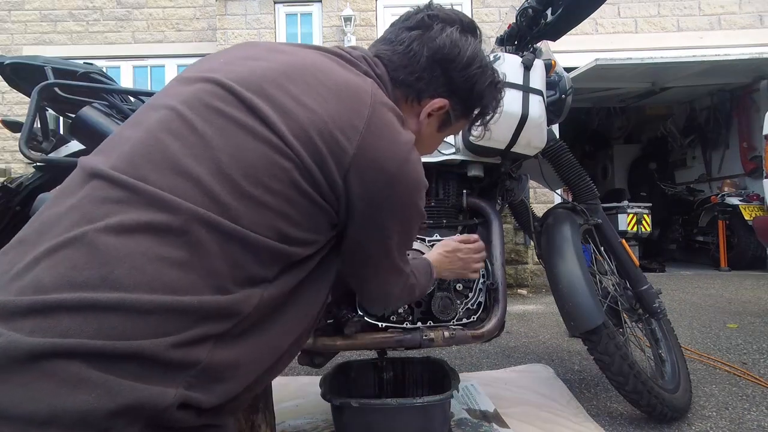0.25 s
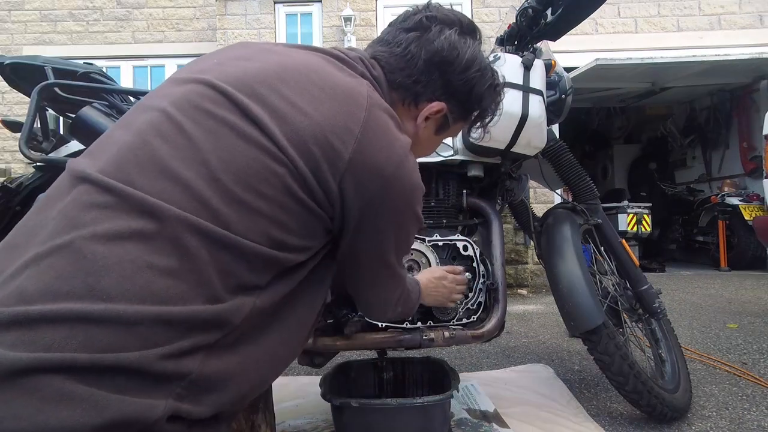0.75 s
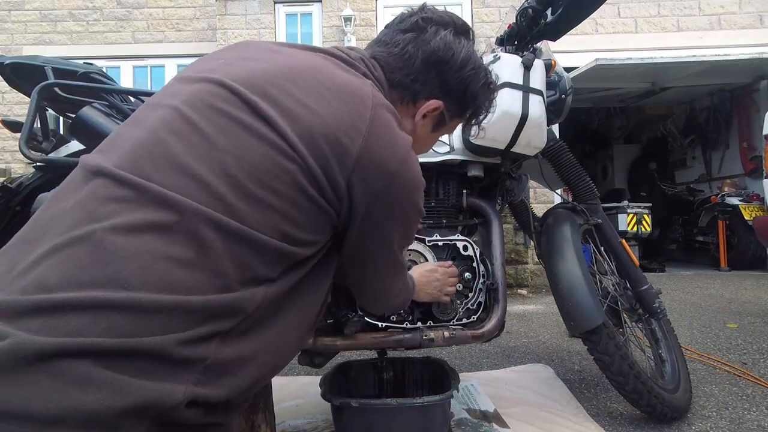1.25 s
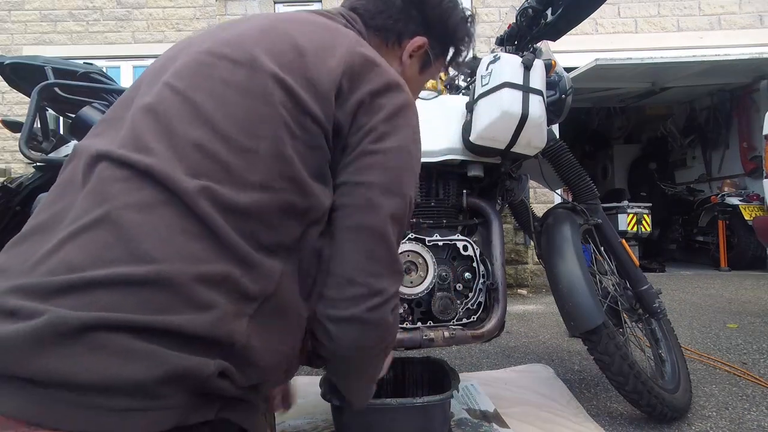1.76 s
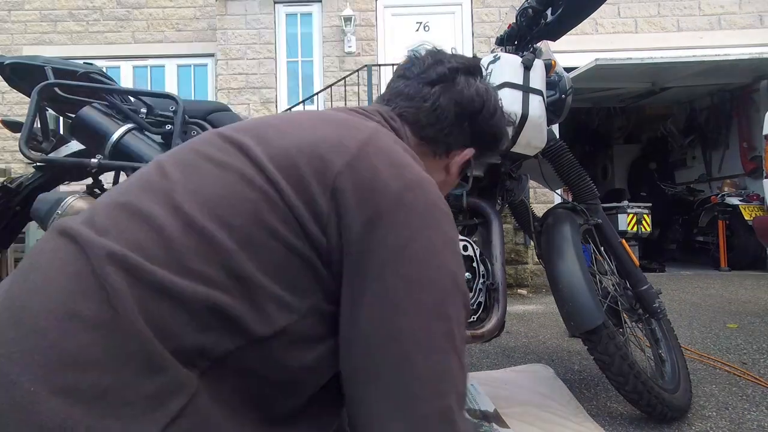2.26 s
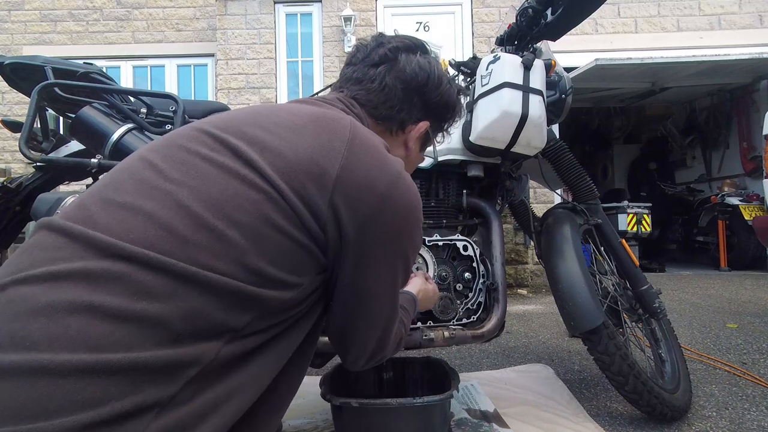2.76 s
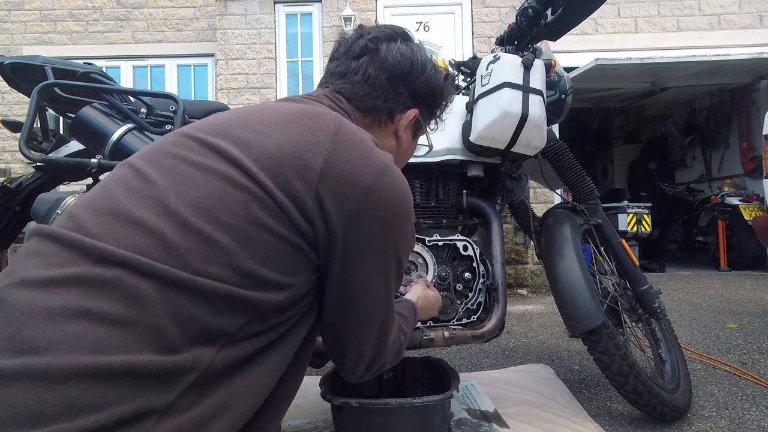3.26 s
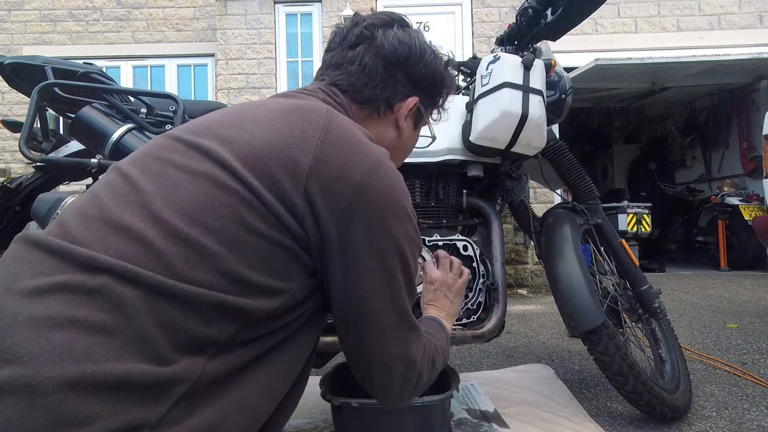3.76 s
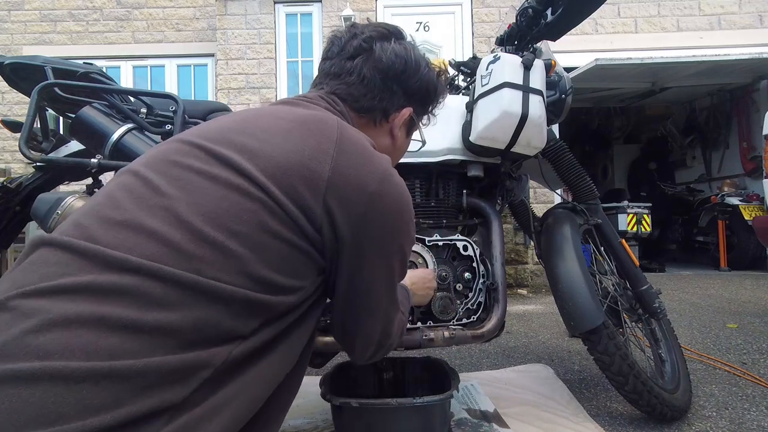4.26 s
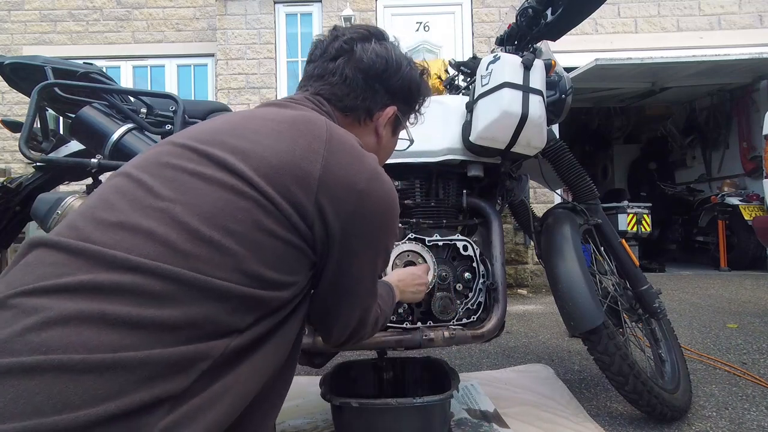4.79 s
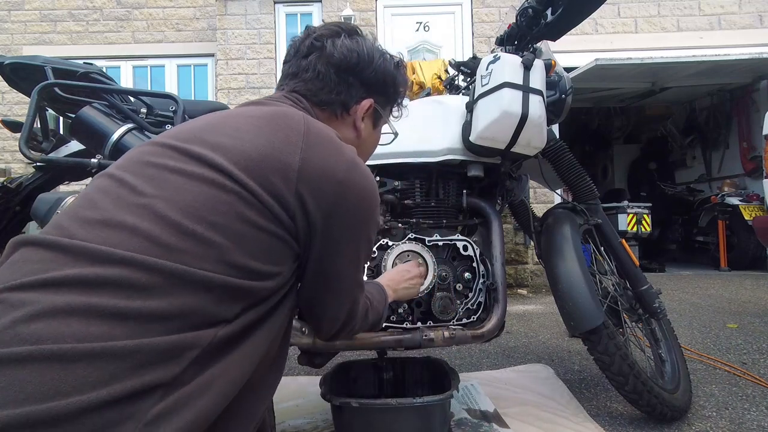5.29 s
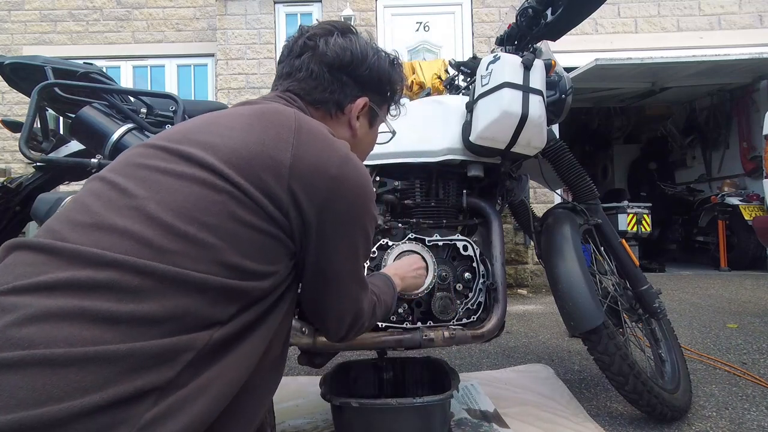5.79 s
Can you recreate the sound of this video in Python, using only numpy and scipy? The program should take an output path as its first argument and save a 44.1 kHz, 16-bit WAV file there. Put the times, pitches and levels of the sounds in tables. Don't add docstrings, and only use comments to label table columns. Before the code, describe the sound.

A driveway beside an open garage, heard through a small hissy camera microphone with low, distant traffic throughout. At 0.1 s an oily steel plate lands in a clutch basket with a quick double clack and a soft low boom, with a late tick at 0.2. A second, duller plate lands at 0.38, slides and is pushed home at 0.45. From 0.8 to 0.94 a third rattles, scrapes and snaps in loudly near 0.9. After faint touches at 1.26, the hardest, brightest knock comes at 1.3, with a boomy push at 1.35; the housing tolls on briefly and the garage echoes. From 1.8 to 2.8 only faint cloth rubs and a tiny low bump at 2.3. Quiet until 4.24, when light, damped small-part clicks begin, with a cloth brush at 4.4, more ticks to 4.8, and sharper clicks at 5.12 and 5.26. Far bird whistles flutter downward from 5.3 to 6.

```python
import sys
import numpy as np
from scipy import signal
from scipy.fft import rfft, irfft, next_fast_len
from scipy.io import wavfile
from scipy.ndimage import uniform_filter1d

SR = 44100
rng = np.random.default_rng(int(sys.argv[2]) if len(sys.argv) > 2 else 0)


def wav_record(signal):
    frames = np.transpose(np.atleast_2d(signal))
    bounded = np.clip(frames, -1, 1)
    quanta = np.round(bounded * 32767).astype(np.int16)
    wavfile.write(sys.argv[1], SR, quanta)


def elevation(decibels):
    levels = np.asarray(decibels, float)
    return 10 ** (levels / 20)


N = 266099

# (mode [Hz], width [Hz], level [dB])
BASKET_MODES = [(660, 119, -9), (880, 61, -1), (1100, 79, -5.5), (1214, 44, -1.5), (1400, 49, -3),
                (1460, 47, -2), (1547, 61, -1.5), (1660, 48, 0), (1760, 67, -4.5), (2100, 24, -2),
                (2174, 120, -6), (2410, 40, -3.5), (2520, 39, -9), (2897, 64, -3.5), (3250, 140, -10),
                (3410, 59, -3.5), (3650, 82, -17.5), (4640, 133, -6), (5010, 300, -7.5), (5230, 144, -7),
                (5420, 100, -21), (6200, 32, -12), (6650, 120, -23), (7370, 170, -13), (7770, 110, -11),
                (8130, 140, -28.5), (9000, 130, -16.5), (9000, 190, -19), (10700, 150, -30)]


def unit(x):
    return x / np.sqrt(np.mean(x ** 2) + 1e-20)


def along(points, hz):
    f, v = np.transpose(points)
    return np.interp(np.log(hz + 1), np.log(f + 1), v)


def filtered(x, response):
    m = next_fast_len(len(x) + SR // 8)
    return irfft(rfft(x, m) * response(np.fft.rfftfreq(m, 1 / SR)), m)[:len(x)]


def resonances(modes):
    def response(f):
        total = 0
        for k, (hz, width, db) in enumerate(modes):
            damping = 1j * f * width
            total = total + (-1) ** k * elevation(db) * damping / (hz * hz - f * f + damping)
        return total
    return response


def minimum_phase(points):
    def response(f):
        cepstrum = irfft(np.log(elevation(along(points, f))))
        cepstrum[1:len(f) - 1] *= 2
        cepstrum[len(f):] = 0
        return np.exp(rfft(cepstrum))
    return response


def rush(spectrum, patchy_db):
    z = signal.stft(rng.standard_normal(N), nperseg=512)[2]
    field = uniform_filter1d(rng.standard_normal(z.shape), size=6, axis=0)
    field = uniform_filter1d(field, size=10, axis=1)
    patchy = signal.istft(z * elevation(patchy_db * unit(field)), nperseg=512)[1][:N]
    return unit(filtered(patchy, lambda hz: elevation(along(spectrum, hz))))


def add(track, s, sound, db):
    track[round(s * SR):][:len(sound)] += elevation(db) * sound / np.max(np.abs(sound))


def strokes(rows):
    t = np.arange(0, N / SR, 1 / 1000)
    level = np.zeros(len(t))
    for s, db, rise, fall in rows:
        away = np.where(t < s, (s - t) / rise, (t - s) / fall)
        level += elevation(db - 20 * away ** 1.27)
    return np.interp(np.arange(N) / SR, t, level)


def background():
    # (time [s], level [dB])
    street = [(0.0, -58), (0.87, -58), (0.96, -58), (1.29, -57), (1.43, -56.5), (1.64, -58), (2.47, -58),
              (3.19, -61), (4.28, -60), (4.43, -59), (6.03, -58)]
    # (frequency [Hz], level [dB per Hz])
    deep = [(20, -42.5), (35, 2.5), (43, 3), (55, 3.5), (68, -7), (90, -5.5), (120, -63.5)]
    # (frequency [Hz], level [dB per Hz])
    low_rumble = [(50, -67), (85, -47), (102, -56.5), (135, -4), (164, 2.5), (188, -3), (221, -3),
                  (258, -5.5), (329, -9.5), (383, -12.5), (450, -15), (580, -37), (990, -120)]
    # (frequency [Hz], level [dB per Hz])
    far_traffic = [(240, -35.5), (400, -3), (530, -2), (730, -4), (1100, -5.5), (1600, -8), (2200, -11.5),
                   (2800, -14.5), (3400, -19), (3900, -23.5), (4300, -27.5), (4800, -25), (5250, -20),
                   (5800, -27.5)]
    # (frequency [Hz], level [dB per Hz])
    mic_hiss = [(4000, -62), (5200, -19), (5850, -10.5), (6270, -1), (7080, 0), (8240, -1), (9900, -3.5),
                (11400, -8.5), (12400, -8.5), (14700, -11.5), (15700, -18.5)]
    s, db = np.transpose(street)
    swell_db = np.interp(np.arange(N) / SR, s, db)
    swell_db = swell_db - np.mean(swell_db)
    rumble = elevation(-56 + 1.34 * swell_db) * rush(low_rumble, patchy_db=1)
    rumble = rumble + elevation(-78.5) * rush(deep, patchy_db=-2.5)
    traffic = elevation(-60.5 + 0.96 * swell_db) * rush(far_traffic + [(8000, -92)], patchy_db=0.73)
    hiss = elevation(-66 + 0.82 * swell_db) * rush(mic_hiss, patchy_db=0.2)
    return rumble + traffic + hiss


def bird():
    # (time [s], length [s], start [Hz], end [Hz], level [dB])
    chirps = [(5.31, .04, 2700, 2580, -67), (5.382, .035, 2700, 2600, -64), (5.41, .035, 2520, 2430, -67),
              (5.447, 0.035, 2680, 2600, -73), (5.599, 0.032, 2770, 2250, -57),
              (5.64, 0.046, 2640, 2610, -69), (5.788, 0.035, 2450, 2250, -62),
              (5.808, 0.035, 1964, 1580, -59), (5.893, 0.0314, 2520, 2210, -57.5),
              (5.912, 0.021, 2160, 1900, -59), (5.926, 0.039, 2460, 1980, -62),
              (6.015, 0.018, 2340, 2210, -58)]
    track = np.zeros(N + SR)
    for s, length, start_hz, end_hz, db in chirps:
        u = np.linspace(0, 1, round(length * SR))
        phase = 2 * np.pi * np.cumsum(start_hz + (end_hz - start_hz) * u ** 1.11) / SR
        flutter = 1 + 0.25 * np.interp(u, np.linspace(0, 1, 7), rng.standard_normal(7))
        whistle = np.sin(phase) + 0.42 * np.sin(phase / 2)
        add(track, s, flutter * np.sin(np.pi * u) * whistle, db + 4.0)
    return track[:N]


def thump():
    track, t = np.zeros(N + SR), np.arange(SR // 10) / SR
    add(track, 2.29, t * np.exp(-t / 0.0018), -55)
    return track[:N]


def shuffle():
    # (peak time [s], level [dB], rise [s], fall [s])
    rubs = [
        (1.81, -80, .12, .12),
        (1.964, -67, 0.055, 0.13),
        (2.2, -68, .25, .08),
        (2.276, -66.5, .06, 0.032),
        (2.466, -68, 0.14, .035),
        (2.65, -71, 0.34, .27),
        (4.362, -72, .035, .05),
        (4.402, -58.5, 0.019, 0.073),
        (4.686, -65, .014, .03),
        (4.74, -66, .012, .13),
    ]
    # (frequency [Hz], level [dB])
    fabric = [(700, -39), (1200, -4), (2500, -8), (4200, -17), (5200, -4), (5900, -16), (8000, -14),
              (11000, -23), (14000, -61)]
    grains = rng.standard_normal(N) * elevation(3.0 * rng.exponential(size=N))
    cloth = unit(filtered(grains, lambda hz: elevation(along(fabric, hz))))
    return elevation(4.0) * strokes(rubs) * cloth


def contact(track, s, db, hz, bright_db, top_db, chatter_ms, damping, crack_db, lowest):
    t = np.arange(SR // 12) / SR
    u = 1000 * t / max(chatter_ms, .15)
    chatter = u * np.exp(-u) * rng.standard_normal(len(t)) * elevation(2.47 * rng.exponential(size=len(t)))
    struck = []
    for mode_hz, width, level in BASKET_MODES:
        near_db = 8 * np.exp(-(np.log2(mode_hz / hz) / 0.1) ** 2)
        struck.append((mode_hz, damping * width, level + rng.normal(0, 3.0) + near_db))
    ring = unit(filtered(chatter, resonances(struck))) + elevation(crack_db) * unit(chatter)

    def clack(f):
        return 1 / (1 + (f / 3900) ** 8) / (1 + (lowest * hz / (f + 1)) ** 4)

    def bright(f):
        return elevation(-3 * (np.log2(f / 5100 + 1e-9) / 0.26) ** 2)

    def top(f):
        return 1 / (1 + (f / 12500) ** 4) / (1 + (6500 / (f + 1)) ** 12)

    add(track, s, filtered(ring, clack), db)
    add(track, s, filtered(ring, bright), db + bright_db - 3.0)
    add(track, s, filtered(ring, top), db + top_db)


def small_parts():
    # (time [s], clack [dB], strongest ring [Hz], top [dB re clack], chatter [ms])
    clicks = [(4.240, -40.5, 1790, 1, 1.5), (4.244, -46.5, 3700, -5, 3.2), (4.261, -51, 1740, -3, 1.6),
              (4.353, -53, 1760, -20, 7.4), (4.3955, -39, 1900, -18, 1), (4.403, -41.5, 2240, 15.5, 1.4),
              (4.410, -44, 1190, 10.5, 2.4), (4.427, -53, 1500, -14, 4), (4.520, -47.5, 2000, -10, 2.4),
              (4.682, -46.5, 1800, 0, 1.1), (4.737, -51.5, 2100, -4, 2.1), (4.783, -56, 1760, -10, 2.1),
              (5.009, -50.5, 2420, -18, 2.2), (5.078, -54, 1510, -25, 3), (5.1157, -42, 1760, 4, 0.64),
              (5.122, -53, 2570, 5, 2.3), (5.2585, -39, 2030, 11, 0.7), (5.265, -46, 2020, 8, 0.84)]
    track = np.zeros(N + SR)
    for s, db, hz, top_db, chatter_ms in clicks:
        bright_db = -3.5 + 0.27 * top_db
        contact(track, s, db, hz, bright_db, top_db, chatter_ms, damping=1.45, crack_db=0.5, lowest=0.41)
    return track[:N]


def tolls():
    # (time [s], mode [Hz], level [dB], t60 [s])
    long_modes = [(.1, 582, -48, .35), (.9, 925, -47, .7), (.9, 582, -46, .4), (1.304, 888, -46, .8),
                  (1.352, 931, -44, .9), (1.352, 581, -39, .5), (1.352, 393, -42, .43),
                  (1.352, 458, -48, .55), (1.352, 818, -50, .6), (1.352, 732, -52, .7),
                  (.94, 4650, -50, .13)]
    track, t = np.zeros(N + SR), np.arange(SR // 2) / SR
    for s, hz, db, t60 in long_modes:
        pair = np.sin(2 * np.pi * hz * t) + .45 * np.sin(2 * np.pi * 1.013 * hz * t)
        add(track, s, (1 - np.exp(-t / .003)) * elevation(-60 * t / t60) * pair, db)
    return track[:N]


def housing(knocks):
    # (mode [Hz], width [Hz], level [dB])
    long_ring = [(390.5, 8, 8.5), (458, 6, 5), (582, 5.1, 12), (732, 6, -1), (818, 6, 2.5), (888, 4, 2),
                 (931, 7, 2), (1480, 14, -15), (1100, 8, -12), (4660, 45, -18), (5340, 90, -20),
                 (7650, 50, -10)]
    return elevation(-10.5) * filtered(knocks, resonances(long_ring))


def frame():
    # (time [s], level [dB], hardness [dB])
    pushes = [(.093, -32, -1), (.099, -42, -15), (.124, -37, -4.5), (0.386, -47.5, 5), (0.401, -42, -2.5),
              (.452, -35.5, -13), (0.807, -29.5, -2), (.836, -30.5, 3), (0.864, -36.5, 0),
              (0.878, -30, 6.5), (0.901, -26, -9), (.925, -33, -3.5), (.968, -39, -22), (1.252, -40, -6),
              (1.302, -30.5, 3), (1.352, -19, -8.5), (1.378, -24, -10)]
    # (mode [Hz], width [Hz], level [dB])
    boom_modes = [(163.3, 24.2, -6), (204.8, 21.7, -2.5)]
    # (mode [Hz], width [Hz], level [dB])
    panel_modes = [(240, 76, -2), (331.5, 44, 0.5), (427, 48, -2.5), (555, 67, -5), (619, 34, -1.5)]
    track, t = np.zeros(N + SR), np.arange(SR // 3) / SR
    boom = filtered(t * np.exp(-t / 0.0085), resonances(boom_modes))
    for s, db, hard_db in pushes:
        add(track, s, boom, db)
        shake = t * np.exp(-t / 0.0095) * rng.standard_normal(len(t))
        rattle = filtered(shake, resonances(panel_modes))
        add(track, s, filtered(rattle, resonances([(415, 570, 0)])), db + hard_db)
    return track[:N]


def scrape():
    # (peak time [s], level [dB], rise [s], fall [s])
    slides = [
        (.39, -48, 0.013, .13),
        (.812, -44, 0.0067, 0.11),
        (.86, -44, .05, .06),
        (.90, -38, .06, 0.077),
    ]
    grains = rng.standard_normal(N) * elevation(3 * rng.exponential(size=N))
    held = [(hz, 2.4 * width, db - 2.9 * np.log2(hz / 1500)) for hz, width, db in BASKET_MODES]
    return strokes(slides) * unit(filtered(grains, resonances(held)))


def rings():
    # (time [s], mode [Hz], level [dB])
    ringing_modes = [(.0965, 1670, -19), (0.1005, 1717, -20), (.096, 863, -29), (.096, 1155, -26),
                     (0.1003, 1484, -23), (.216, 1627, -40.5), (.385, 1646, -25), (.449, 1146, -30.5),
                     (.806, 680, -29.5), (.806, 1424, -29), (.879, 1155, -21.5), (.898, 1680, -16.5),
                     (1.257, 554, -45), (1.258, 1190, -49), (1.258, 800, -47), (.812, 1480, -32),
                     (4.737, 1850, -55), (4.25, 1750, -52), (1.286, 740, -44), (1.3062, 1230, -31),
                     (1.311, 1424, -21), (1.3055, 695, -22), (1.3055, 1465, -18), (1.35, 640, -28.5),
                     (1.35, 1520, -27), (4.241, 1733, -47), (4.241, 1075, -50.5), (4.354, 1770, -53),
                     (4.397, 1720, -47), (4.684, 1800, -54), (5.116, 1820, -40), (5.258, 1947, -33),
                     (5.258, 1760, -39),
                     (0.102, 3410, -31), (0.11, 2280, -33), (.099, 4730, -29), (.385, 2044, -24),
              (.386, 3310, -33), (.386, 5100, -35), (.4495, 7830, -47), (.386, 6040, -41.5),
              (.853, 6150, -39), (.853, 4600, -37), (.823, 5400, -36), (.881, 7680, -33),
              (.8985, 4826, -25), (.8985, 5370, -31), (.939, 4300, -34.5), (.938, 3330, -36),
              (.853, 3310, -34), (.852, 2140, -37), (1.304, 3840, -26.5), (1.304, 5180, -26),
              (1.304, 3322, -30), (1.351, 5210, -29.5), (4.356, 5150, -57), (4.366, 5400, -61),
              (4.524, 5000, -59), (4.688, 5250, -55.5), (4.738, 5200, -58), (4.783, 5150, -61),
              (4.415, 4950, -53), (4.241, 4900, -50), (.395, 2100, -33), (.449, 3350, -44),
              (.452, 4800, -40.5), (.851, 7600, -44.5), (.888, 7650, -39.5), (.946, 4650, -37),
              (.904, 6600, -36), (1.351, 2080, -30), (5.116, 2570, -45), (5.258, 5290, -38),
              (5.259, 9210, -35), (5.259, 8750, -35), (4.404, 4630, -47), (2.452, 5400, -57),
              (1.955, 5200, -61)]
    track, t = np.zeros(N + SR), np.arange(SR // 8) / SR
    for s, hz, db in ringing_modes:
        t60 = 0.047 * 0.77 ** np.log2(hz / 2000) - .0005 * (db + 33)
        wander = np.cumsum(rng.standard_normal(len(t))) * 0.038 * np.sqrt(hz / 2000)
        beat = 1 + .5 * np.cos(2 * np.pi * hz * rng.uniform(0.013, 0.048) * t)
        choke = elevation(-60 * (t / (.75 * t60)) ** 1.6)
        tone = np.sin(2 * np.pi * hz * t + wander)
        add(track, s, (1 - np.exp(-t / 0.0005)) * choke * beat * tone, db)
    return track[:N]


def blow():
    track, t = np.zeros(N + SR), np.arange(SR // 100) / SR
    pulse = np.sin(2 * np.pi * 1120 * t) * t ** 2 * np.exp(-t / .0005)
    add(track, 1.3028, pulse, -6)
    return track[:N]


def plates():
    # (time [s], clack [dB], strongest ring [Hz], bright [dB re clack], chatter [ms])
    first = [
        (.088, -42, 1650, -14, 2.7),
        (.0948, -16.5, 1680, -9, 2.5),
        (.1007, -16.5, 1510, -3, 0.76),
        (.108, -27, 2380, -7, 2.4),
        (.213, -39, 1660, -23, 2.3),
    ]
    second = [
        (0.3838, -19, 1960, -11, 1.9),
        (.395, -26, 2100, -24, 1.4),
        (.403, -37, 1660, -19, 1.6),
        (.423, -36, 1690, -32, 5.3),
        (.444, -38, 1510, -12, 2),
        (0.4487, -22.5, 1230, -12, 0.76),
        (.455, -30.5, 2290, -9, 0.78),
    ]
    third = [(.8055, -24.5, 666, -17, 1.2), (.809, -33, 1400, -11, 2.5), (.822, -27, 3250, -7, 1.7),
             (.828, -23.5, 1770, -21, 2.1), (.837, -28.5, 1580, -8, 2.7), (.850, -27, 2100, -5, 3.3),
             (.858, -29, 3250, -13, 3.4), (.880, -21, 1120, -11, 1.5), (.8845, -19, 1500, -14, 2),
             (.8972, -12, 1700, -4, 1.5), (.905, -22, 1780, -3, 1.2), (.909, -27, 2200, -4, 1),
             (.913, -36, 1660, -14, 3.7), (.938, -28.5, 2240, -7, 3.4)]
    fourth = [
        (1.2575, -45, 800, -25, 1.5),
        (1.286, -38.5, 760, -23, 1.9),
        (1.294, -25.5, 1080, -18, 6.6),
        (1.3035, -17, 3310, -4, 1.46),
        (1.306, -17, 1470, -20.5, 3.7),
        (1.3507, -19, 900, -13, 1.4),
        (1.357, -28.5, 1460, -16, 3.5),
    ]
    dry_dbs = [
        -13.5,
        -21,
        -9.5,
        -1,
    ]
    track = np.zeros(N + SR)
    for contacts, dry_db in zip([first, second, third, fourth], dry_dbs):
        for s, db, hz, bright_db, chatter_ms in contacts:
            top_db = dry_db + 0.9 * bright_db
            contact(track, s, db, hz, bright_db, top_db, chatter_ms, damping=1.88, crack_db=-2.5, lowest=0.36)
    return track[:N]


def echo(x, t60s, delay_s):
    out, size = np.zeros(N + SR), SR // 4
    for start in range(0, N, size):
        hz, t, z = signal.stft(rng.standard_normal(SR // 2), SR, nperseg=256)
        decay = elevation(-60 * t / along(t60s, hz)[:, None])
        tail = signal.istft(z * decay, SR, nperseg=256)[1]
        answer = signal.fftconvolve(x[start:start + size], tail / np.linalg.norm(tail))
        out[start + round(delay_s * SR):][:len(answer)] += answer
    return out[:N]


def surroundings(work, calls):
    # (frequency [Hz], t60 [s])
    close_by = [(200, 0.18), (2000, 0.09), (10000, 0.073)]
    # (frequency [Hz], t60 [s])
    driveway = [(200, 0.29), (700, 0.58), (2000, 0.2), (5000, 0.23), (10000, 0.093)]
    near = elevation(-13.5) * echo(work + elevation(7) * calls, close_by, delay_s=.004)
    garage = elevation(-23.5) * echo(work + elevation(16.5) * calls, driveway, delay_s=.023)
    return near + garage


def microphone(sound):
    # (frequency [Hz], gain [dB])
    capsule = [(60, -38), (110, -17), (140, -3.5), (3500, -0.5), (4200, -2.5), (5200, 1), (6000, 1),
               (10000, -0.5), (11500, -18), (14000, -16), (15700, -23)]
    return filtered(sound, minimum_phase(capsule))


def scene():
    knocks = plates() + frame() + rings() + blow() + scrape()
    work = knocks + small_parts() + housing(knocks) + tolls()
    calls = bird()
    heard = microphone(work + surroundings(work, calls) + elevation(-0.9) * calls)
    return (heard + shuffle() + background() + thump())[None]


def band_limit(x):
    return signal.sosfilt(signal.butter(12, 15330, fs=SR, output="sos"), x)


def record(dry):
    return band_limit(dry)


dry = scene()
out = record(dry)
wav_record(out)
```